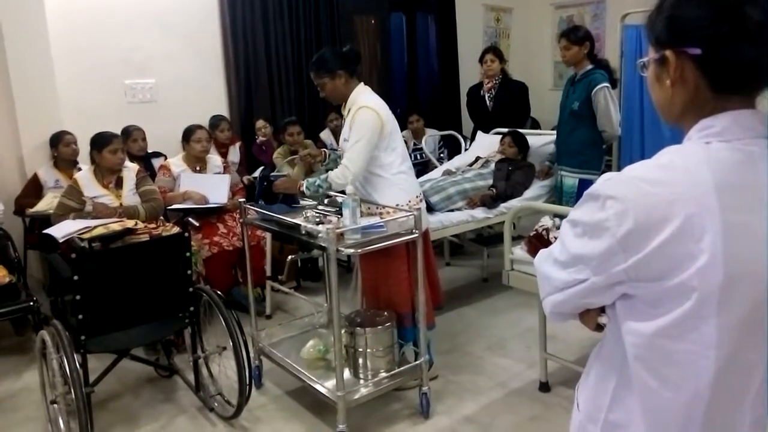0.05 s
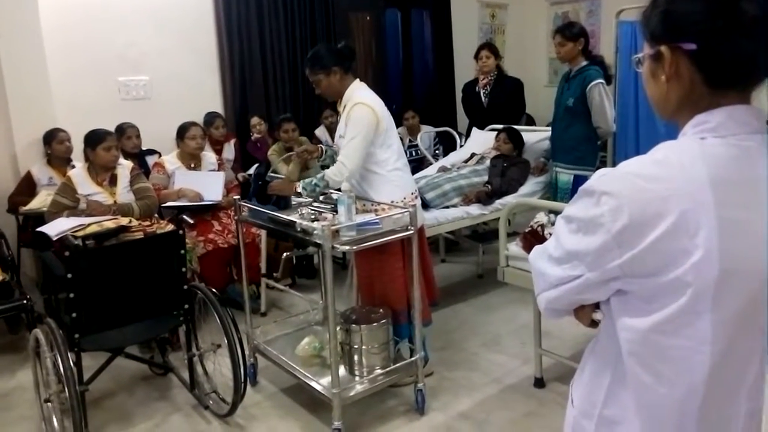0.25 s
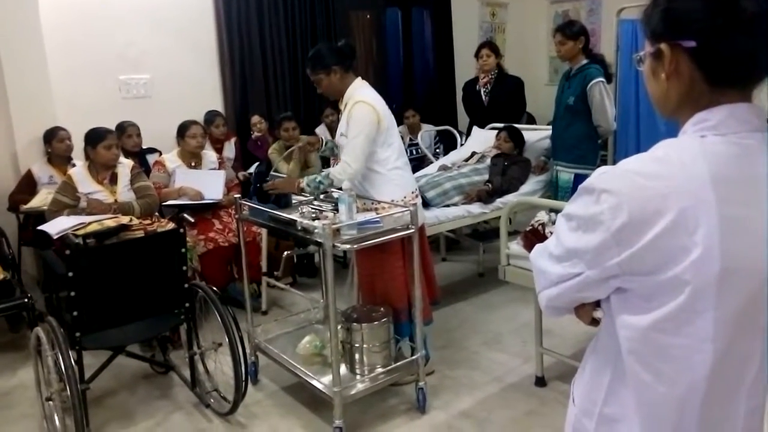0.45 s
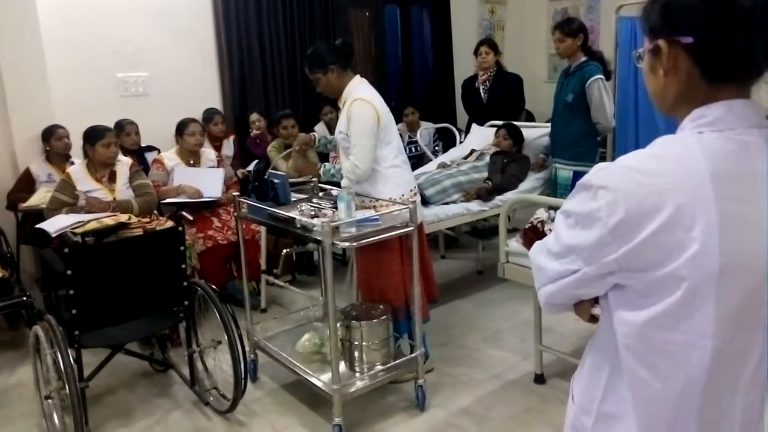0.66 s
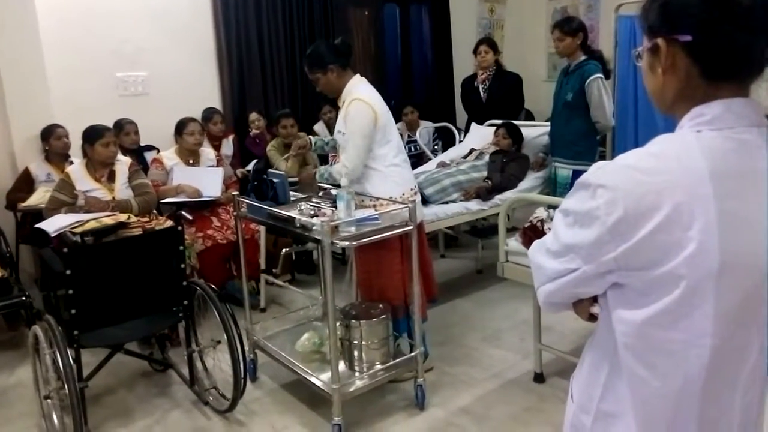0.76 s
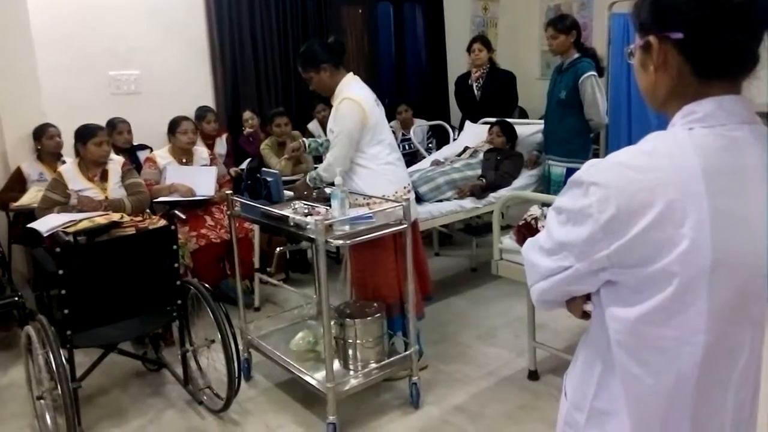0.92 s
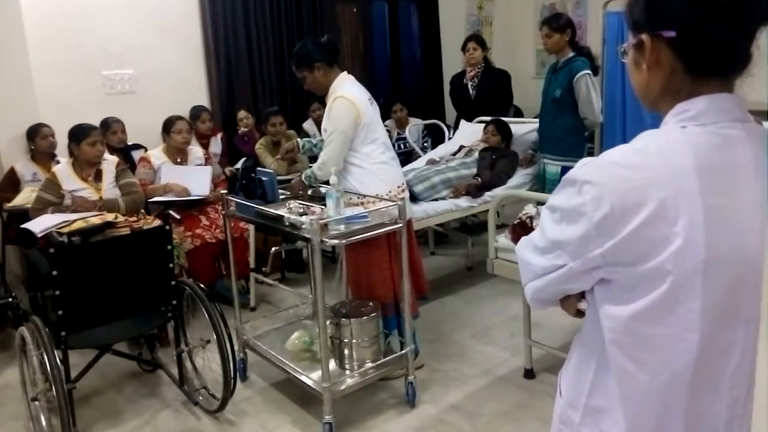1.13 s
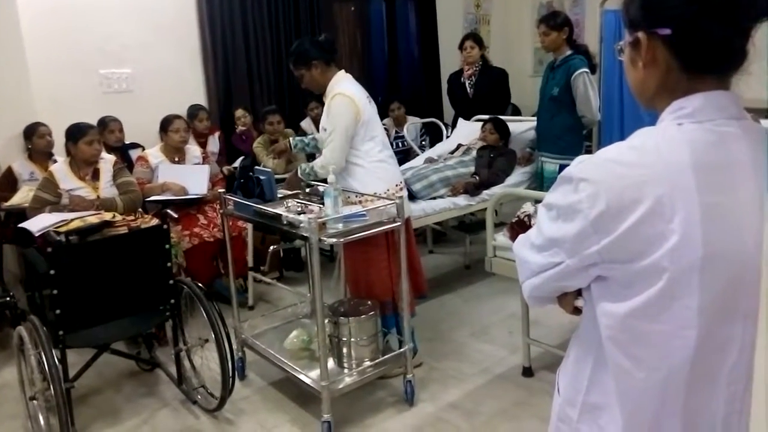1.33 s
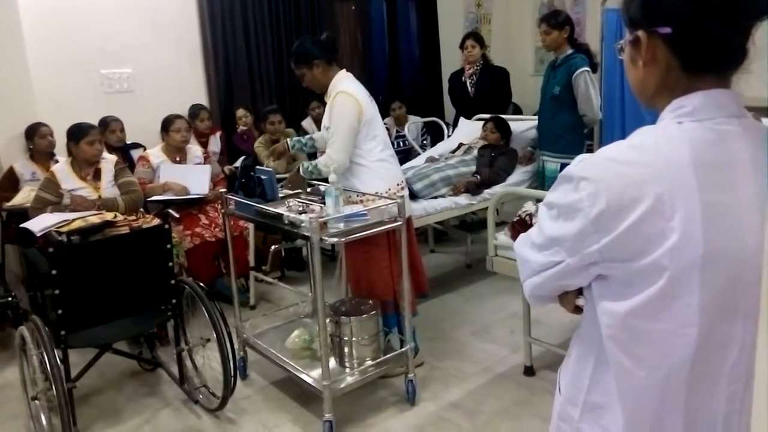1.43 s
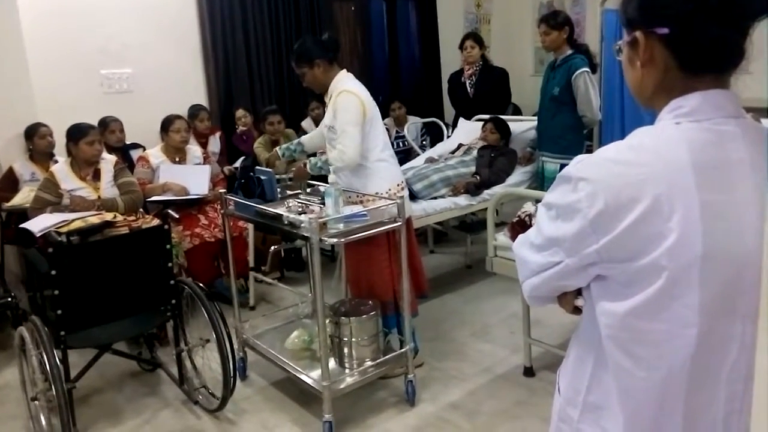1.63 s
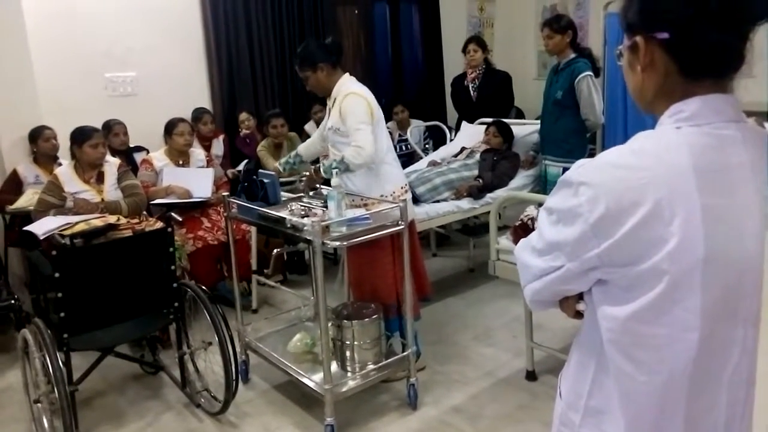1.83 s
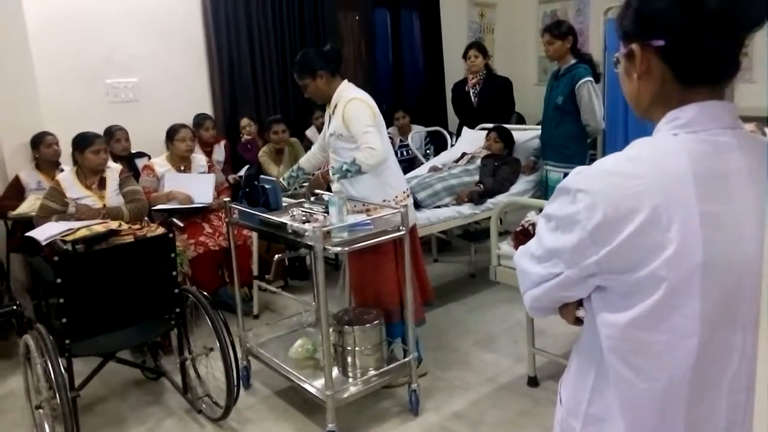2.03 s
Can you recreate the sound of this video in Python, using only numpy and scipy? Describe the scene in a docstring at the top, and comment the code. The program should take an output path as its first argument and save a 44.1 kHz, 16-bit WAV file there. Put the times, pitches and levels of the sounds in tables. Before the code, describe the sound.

Steel instruments clatter on a metal trolley, a ringing crash, softer knocks, then one sharp loud clack

```python
"""A steel crash, ringing at full strength from the first sample, then three more blows, clinks and slides:
steel instruments on a thin steel trolley a few metres from a phone, in a small hard room.
Blows are banded noise plus decaying modes, cut to a weaker tail; clinks are noise bursts in a narrow band;
slides are random grit through resonances. Lumpy rumble, wavering low tones and faint hiss lie underneath."""
import sys
import numpy as np
from scipy import signal
from scipy.fft import rfft, irfft
from scipy.io import wavfile
from scipy.ndimage import uniform_filter1d

SR = 44100
rng = np.random.default_rng(int(sys.argv[2]) if len(sys.argv) > 2 else 0)


def magnitude_from_level(level_db):
    """Linear magnitude for a level in decibels (20 dB per decade)."""
    exponent = np.asarray(level_db, float) / 20
    return 10 ** exponent


def to_wav(sig):
    """Store sig (one row per channel, or 1-D mono) as 16-bit WAV at the path in sys.argv[1].

    Samples outside -1..1 are clipped; the rate is SR.
    """
    pcm = np.clip(np.atleast_2d(sig), -1, 1) * 32767
    pcm = np.round(pcm).astype(np.int16)
    wavfile.write(sys.argv[1], SR, pcm.T)  # frames by channels


N = 91772


def evened(x):
    """Scales to rms 1."""
    return x / np.sqrt(np.mean(x ** 2) + 1e-20)


def read(points, hz):
    """Interpolates a spectrum in dB on a log-frequency axis."""
    point_hz, level_db = np.transpose(points)
    return np.interp(np.log(hz + 1), np.log(point_hz + 1), level_db)


def colour(x, points):
    """Filters x by a spectrum."""
    hz = np.fft.rfftfreq(len(x), 1 / SR)
    return irfft(rfft(x) * magnitude_from_level(read(points, hz)), len(x))


def level_curve(points):
    """Interpolates (start_s, level_db) over the whole scene."""
    return np.interp(np.arange(N) / SR, *np.transpose(points))


def add(mix, start_s, sound):
    """Mixes a sound in at start_s."""
    part = mix[max(round(start_s * SR), 0):][:len(sound)]
    part += sound[:len(part)]


def resonate(x, hz, width_hz):
    """One-pole resonance of gain 1: shift down to 0 Hz, smooth, shift back."""
    turn = np.exp(2j * np.pi * hz * np.arange(len(x)) / SR)
    pole = np.exp(-np.pi * width_hz / SR)
    return 2 * (turn * signal.lfilter([1 - pole], [1, -pole], x / turn)).real


# dense ring spectrum, crash: pitch_hz, density_db_per_hz (relative)
CRASH_SPECTRUM = [(110, -63), (180, -18.5), (622, -12), (760, -6), (899, -9.5), (1130, -5), (1580, -8.5),
                  (1900, -6.5), (5820, -12), (7000, -21), (9100, -72), (15400, -120)]
# clear modes, crash: pitch_hz, level_db (relative), t60_s
CRASH_MODES = [(781, -12, 0.75), (990, -9.5, .4), (1150, 10, 0.96), (1297, 11, 1), (1363, -3, 0.75),
               (1785, -1.5, 1), (1828, 7, 0.98), (2214, -16, 1), (2850, 1, 0.56), (3120, 13.5, 0.17),
               (4270, 8, 0.23), (4500, 8.5, 0.39)]
# dense ring spectrum, shelf: pitch_hz, density_db_per_hz (relative)
SHELF_SPECTRUM = [(120, -42), (200, -5), (303, 2), (648, -1), (968, 2.5), (1090, -5), (2740, -4.5),
                  (3000, -1.5), (5680, -13.5), (7000, -33), (9100, -57), (15400, -120)]
# clear modes, shelf: pitch_hz, level_db (relative), t60_s
SHELF_MODES = [(271.7, -5.5, 0.69), (323, 4, 0.79), (450, 2, 0.9), (824, 5, 0.44), (960, 7, 0.23),
               (2455, -33, .2), (3040, -3.5, 0.34), (3250, -15, .2), (3900, 5.5, 0.19)]
# dense ring spectrum, bowl: pitch_hz, density_db_per_hz (relative)
BOWL_SPECTRUM = [(120, -46), (200, -6), (303, 2), (798, -1), (954, -3), (1840, -1.5), (2260, -6),
                 (3180, -0.5), (5770, -15.5), (7000, -36.5), (9100, -78), (15400, -120)]
# clear modes, bowl: pitch_hz, level_db (relative), t60_s
BOWL_MODES = [(233, 2, 0.79), (316, 8, 0.33), (800, -11, .4), (1840, -7, .3), (2830, -21, .27),
              (2840, -6, .4), (3550, -10, 0.27), (4200, -15, 0.56), (5841, -13, .3)]
# dense ring spectrum, clack: pitch_hz, density_db_per_hz (relative)
CLACK_SPECTRUM = [(240, -50.5), (400, -21), (936, -20.5), (982, -10), (1190, -10), (1490, -12.5),
                  (1640, -8), (1720, -9.5), (2090, -0.5), (3140, -4.5), (3800, -0.5), (5780, -8.5),
                  (7000, -37), (9100, -62.5), (15400, -120)]
# clear modes, clack: pitch_hz, level_db (relative), t60_s
CLACK_MODES = [(970, -11.5, 0.82), (1630, -3.5, .3), (2030, 6, 0.25), (2153, -23.5, 0.404), (2385, -12, .4),
               (2830, -6.5, 0.75), (2729, -6.5, .3), (3200, -4.5, 0.22), (3500, -4, 0.59),
               (3990, -10.5, 0.84), (4040, -6, .3), (3980, -14, 0.9), (4580, -4.5, 0.17), (4590, 18, 0.067),
               (5620, -13, 0.49)]
# blows: start_s, level_db, rise_s (at 1 kHz), t60_s (at 2 kHz), ring_s (before the drop),
# cut_db_per_s, linger_db (tail level against the ring)
BLOWS = [(0.0, -32, .008, 1, 0.13, 117, -7.5), (0.2912, -35.5, 0.0061, 0.57, 0.089, 337, -7.5),
         (.527, -38, 0.031, 0.52, 0.084, 337, -12), (1.2625, -23, .016, 0.41, 0.15, 340, -14)]
# all modes of each thing against its dense ring: modes_db
MODES_DB = (-9, -3, -8, -5)
LONGEST_RISE_S, LINGER_T60_S = 0.031, 0.61  # the latter at 2 kHz
RING_DARKEN, TAIL_DARKEN = 0.36, 0.49  # exponents: decay rate against frequency
PEAKY_DB = 2.5  # rms unevenness of the dense ring's spectrum


def blow(start_s, level_db, rise_s, t60_s, ring_s, cut_db_per_s, linger_db, modes_db, spectrum, modes):
    """Dense ring in octave bands (bass builds later, treble dies sooner) plus the thing's own modes."""
    t = np.arange(SR // 2) / SR
    hz = np.fft.rfftfreq(len(t), 1 / SR)
    bumps = uniform_filter1d(rng.standard_normal(len(hz)), size=8)
    peaks = magnitude_from_level(PEAKY_DB * evened(bumps))  # many small modes
    noise = evened(colour(rng.standard_normal(len(t)), spectrum))
    ring_spectrum = rfft(noise) * peaks / np.sqrt(np.mean(peaks ** 2))
    drop = magnitude_from_level(-cut_db_per_s * np.maximum(t - ring_s, 0))

    def rise(pitch_hz):
        """Squared ramp, slower in the bass; a blow at 0 s is already full."""
        length_s = min(rise_s * 1000 / pitch_hz, LONGEST_RISE_S)
        return np.minimum((t + (start_s <= 0)) / length_s, 1) ** 2

    out = np.zeros(len(t))
    octave = np.log2(hz + 1)
    for k in range(6, 14):
        band_hz = 2 ** k
        band = irfft(ring_spectrum * np.clip(1 - abs(octave - k), 0, 1), len(t))
        ring = drop * magnitude_from_level(-60 * t / t60_s * (band_hz / 2000) ** RING_DARKEN)
        linger = magnitude_from_level(linger_db - 60 * t / LINGER_T60_S * (band_hz / 2000) ** TAIL_DARKEN)
        out += band * rise(band_hz) * np.hypot(ring, linger)

    modes_rms = np.sqrt(sum(magnitude_from_level(db) ** 2 for _, db, _ in modes) / 2)
    for (pitch_hz, mode_db, mode_t60_s), turn in zip(modes, rng.random(len(modes))):
        decay = magnitude_from_level(modes_db + mode_db - 60 * t / max(mode_t60_s, .03))
        fade = np.hypot(drop, magnitude_from_level(linger_db)) * decay
        out += fade / modes_rms * rise(pitch_hz) * np.sin(2 * np.pi * (pitch_hz * t + turn))
    return start_s, out * magnitude_from_level(level_db)


def slow_noise():
    """Smooth random wander of rms 1."""
    return evened(uniform_filter1d(uniform_filter1d(rng.standard_normal(N), 600), 600))


# rumble spectrum: pitch_hz, density_db_per_hz (relative)
RUMBLE_SPECTRUM = [(18, -43.5), (30, -15.5), (60, -12), (110, -3), (200, -3), (320, -8), (500, -18.5),
                   (900, -36.5)]
# rumble level: start_s, level_db
RUMBLE_LEVEL = [(0.0, -51.5), (0.13, -50), (0.26, -61.5), (0.34, -52), (0.43, -61.5), (0.58, -50),
                (0.66, -56), (0.86, -66.5), (0.9, -62), (1.0, -61), (1.06, -70), (1.11, -54), (1.26, -58),
                (1.3, -51), (1.34, -59), (1.39, -52), (1.52, -65.5), (1.8, -61), (1.85, -63), (2.08, -66.5)]
LUMP_DB = 2.2  # rms swing before the spectrum is applied


def rumble(lumps):
    """Low coloured noise, lumpy in level."""
    noise = rng.standard_normal(N) * magnitude_from_level(LUMP_DB * lumps)
    return evened(colour(noise, RUMBLE_SPECTRUM)) * magnitude_from_level(level_curve(RUMBLE_LEVEL))


# hiss spectrum: pitch_hz, density_db_per_hz (relative)
HISS_SPECTRUM = [(180, -43), (300, -3.5), (382, -8.5), (402, -8.5), (696, -12), (1390, -14.5),
                 (2140, -17.5), (5820, -24.5), (7300, -37), (9490, -66.5), (16100, -120)]
# hiss level above HISS_DB: start_s, level_db
HISS_LEVEL = [(0, 10.5), (.5, 6.5), (.85, 6.5), (1.04, 4.5), (1.1, 7), (1.6, 6.5), (2.08, 2)]
HISS_DB = -74.5


def hiss():
    """Faint coloured noise, its level gliding by a few dB."""
    noise = evened(colour(rng.standard_normal(N), HISS_SPECTRUM))
    return noise * magnitude_from_level(HISS_DB + level_curve(HISS_LEVEL))


# faint low tones: start_s, end_s, pitch_hz, level_db (rms at mid-swell)
DRONES = [(.87, 1.03, 226, -63), (.93, 1.04, 148, -63), (1.73, 1.86, 228, -66), (1.74, 1.85, 150, -64),
          (.1, .19, 280, -55)]
WAVER = .02  # rms pitch drift, as a fraction


def drones(lumps):
    """Sines with drifting pitch that swell and fade in a half-ellipse."""
    t = np.arange(N) / SR
    clock_s = np.cumsum(1 + WAVER * slow_noise()) / SR
    out = np.zeros(N)
    for start_s, end_s, pitch_hz, level_db in DRONES:
        swell = np.sqrt(np.maximum(4 * (t - start_s) * (end_s - t), 0)) / (end_s - start_s)
        tone = np.sqrt(2) * np.sin(2 * np.pi * pitch_hz * clock_s)
        out += magnitude_from_level(level_db + lumps) * tone * swell
    return out


# small clinks: start_s, level_db, pitch_hz (band centre), width_hz (each of two passes), t60_s
CLINKS = [(0.429, -68, 2900, 400, .4), (0.5351, -38.5, 3900, 1389, .08), (0.797, -59, 3500, 900, 0.046),
          (.803, -66.5, 3260, 400, 0.21), (.95, -73, 3900, 250, .5), (1.032, -67, 4000, 700, .4),
          (1.0615, -51, 3910, 700, .25), (1.1469, -44.5, 4080, 600, .3), (1.2019, -45, 3900, 900, .12),
          (1.2455, -36, 3900, 800, 0.17), (1.2, -47, 3500, 2100, 0.17), (1.2661, -31.5, 4780, 1195, .06),
          (1.272, -25.5, 3900, 800, .05), (1.477, -68, 5970, 600, .4)]
CLINK_RISE_S = .0015


def clink(start_s, level_db, pitch_hz, width_hz, t60_s):
    """A small tool touches steel: a quick noise burst in one bright band."""
    t = np.arange(SR // 4) / SR
    once = resonate(rng.standard_normal(len(t)), pitch_hz, width_hz)
    ring = evened(resonate(once, pitch_hz, width_hz))
    return start_s, ring * np.minimum(t / CLINK_RISE_S, 1) * magnitude_from_level(level_db - 60 * t / t60_s)


# slides over the tray: start_s, end_s, rise_s, level_db, fade_db (start to end), tilt_db_per_octave
SLIDES = [(1.058, 1.182, 0.032, -43, -5.5, 2.5), (1.201, 1.271, 0.0052, -49.5, -1, 1),
          (1.44, 1.548, 0.027, -51.5, -11, 2), (.46, 0.528, 0.032, -59.5, 5.5, -14.5),
          (.66, 0.718, 0.019, -49.5, -13, -15), (.8, 0.836, 0.016, -65, -27, -4),
          (.93, 1.024, 0.018, -66, -10.5, -2.5), (1.65, 1.758, 0.018, -64, -3, -14)]
# slide spectrum, used from its third row up: pitch_hz, level_db (relative)
SLIDE_SPECTRUM = [(590, -35), (1000, -5), (1330, -6.5), (1430, -8.5), (2490, -10), (5570, -12.5),
                  (7000, -23.5), (9100, -45.5), (15400, -120)]
# tray rings under a slide: pitch_hz, width_hz, level_db (relative)
SLIDE_RINGS = [(840, 25, -2), (1142, 18, -1.5), (1233, 6.3, -8), (1440, 22, 0.5), (1674, 18, -3.5),
               (1840, 22, -2.5), (1966, 18, -6.5), (2280, 7.3, -1.5), (2530, 22, -1), (3015, 38, -4.5),
               (3450, 32, -6), (4070, 35, -2), (4770, 35, -4.5), (5660, 70, -6), (6040, 37, -2.5)]
GRIT_PER_S, GRIT_DB = 2000, 2.5  # catch rate, mean of their exponential level spread
SMOOTH = 2.5  # rms of smooth rubbing noise against grit
RINGS_DB, SLIDE_FALL_S = 14, .011  # ring gain, decay time constant after the end


def slide(start_s, end_s, rise_s, level_db, fade_db, tilt_db_per_octave):
    """Grit of tiny catches, plus smooth noise, excites the tray and its rings."""
    t = np.arange(SR // 4) / SR
    chance, sign, size = rng.random((len(t), 3)).T
    catches = (chance < GRIT_PER_S / SR) * np.sign(sign - .5) * magnitude_from_level(-GRIT_DB * np.log(1 - size))
    grit = evened(catches) + SMOOTH * rng.standard_normal(len(t))
    rings = sum(magnitude_from_level(db) * resonate(grit, hz, width_hz) for hz, width_hz, db in SLIDE_RINGS)
    tray = grit + magnitude_from_level(RINGS_DB) * rings

    length_s = end_s - start_s
    fall = np.exp(-np.maximum(t - length_s, 0) / SLIDE_FALL_S)
    shape = np.minimum(t / rise_s, 1) * magnitude_from_level(fade_db * t / length_s) * fall
    spectrum = [(100, -40.5), (250, -12), (700, -6)] + SLIDE_SPECTRUM[2:]
    # tilt pivots at 1 kHz, constant below 300 Hz
    tilted = [(hz, db + tilt_db_per_octave * np.log2(max(hz, 300) / 1000)) for hz, db in spectrum]
    return start_s, evened(colour(tray, tilted)) * shape * magnitude_from_level(level_db)


def scene():
    """All sources together; one set of lumps sways rumble and drones."""
    lumps = slow_noise()
    mix = rumble(lumps) + hiss() + drones(lumps)
    things = [(CRASH_SPECTRUM, CRASH_MODES), (SHELF_SPECTRUM, SHELF_MODES),
              (BOWL_SPECTRUM, BOWL_MODES), (CLACK_SPECTRUM, CLACK_MODES)]
    for row, modes_db, thing in zip(BLOWS, MODES_DB, things):
        add(mix, *blow(*row, modes_db, *thing))
    for row in CLINKS:
        add(mix, *clink(*row))
    for row in SLIDES:
        add(mix, *slide(*row))
    return mix[None]


# phone microphone response: pitch_hz, gain_db
MIC = [(20, -2.5), (6500, 3), (7000, -5), (7400, -5.5), (7700, -64), (7900, -85), (22050, -110)]


def microphone(dry):
    """Narrow phone band as a linear-phase FIR."""
    hz = np.fft.rfftfreq(2049, 1 / SR)
    taps = np.roll(irfft(magnitude_from_level(read(MIC, hz)), 2049), 1024) * np.hanning(2049)
    return signal.oaconvolve(dry, taps[None], "same")


def top_cut(x):
    """Nothing passes above the cut-off."""
    return signal.sosfilt(signal.butter(12, 7500, fs=SR, output="sos"), x)


def record(dry):
    """Phone band, a faint white noise floor and a small constant offset."""
    floor = magnitude_from_level(-95.5) * rng.standard_normal(dry.shape)
    mix = microphone(dry) + floor - 0.00075
    return top_cut(mix)


dry = scene()
out = record(dry)
to_wav(out)
```